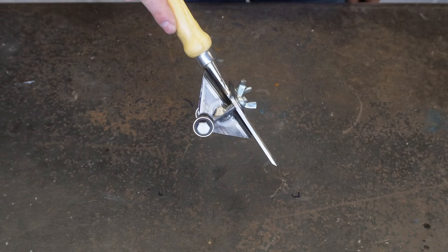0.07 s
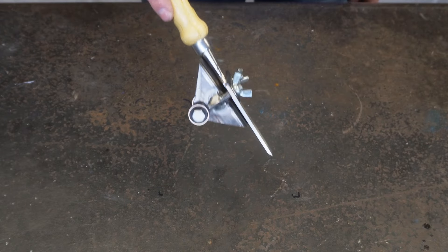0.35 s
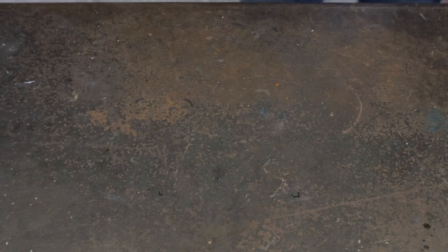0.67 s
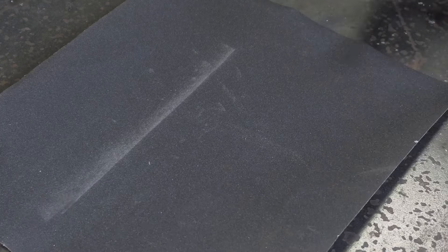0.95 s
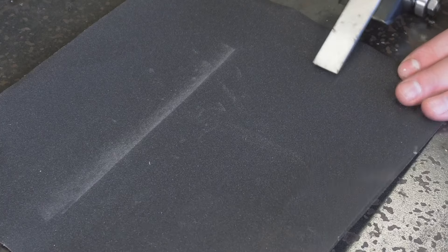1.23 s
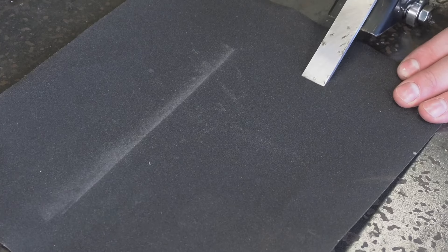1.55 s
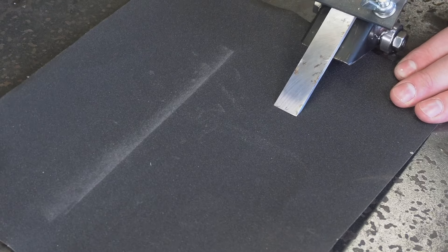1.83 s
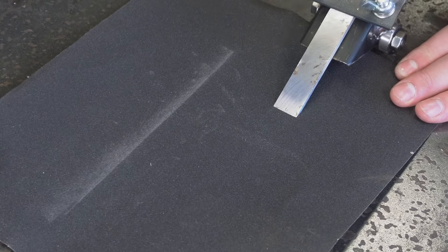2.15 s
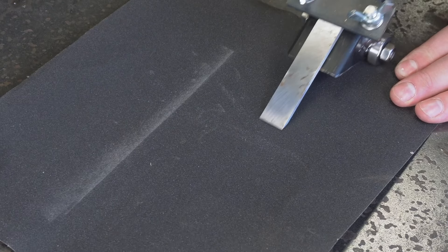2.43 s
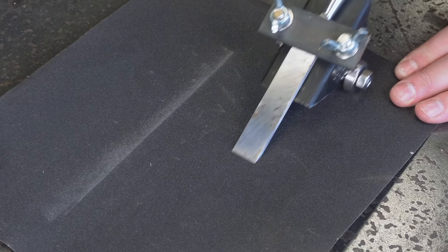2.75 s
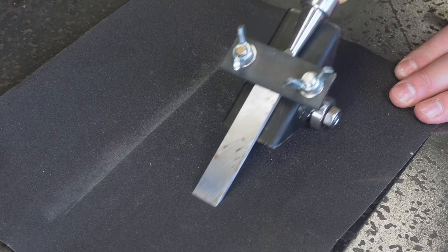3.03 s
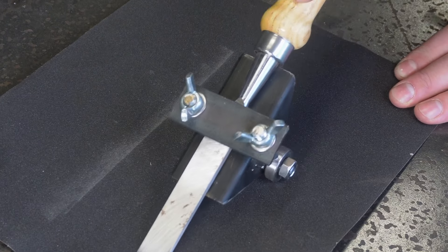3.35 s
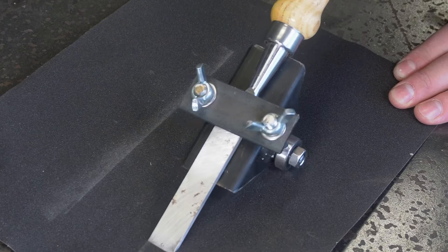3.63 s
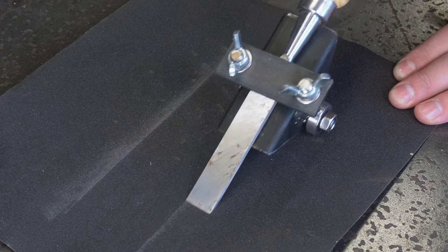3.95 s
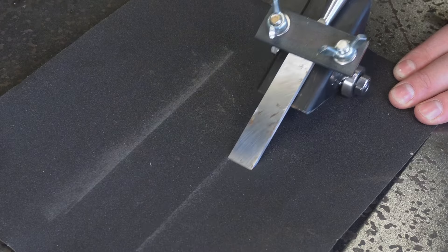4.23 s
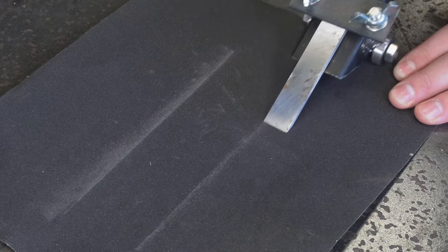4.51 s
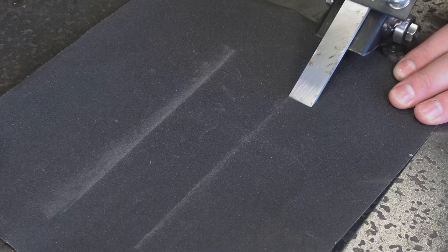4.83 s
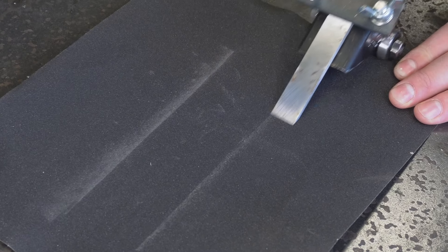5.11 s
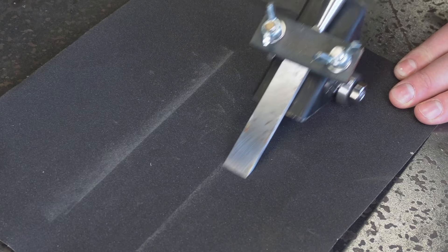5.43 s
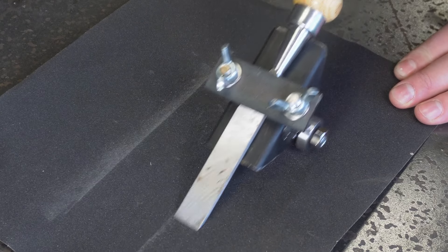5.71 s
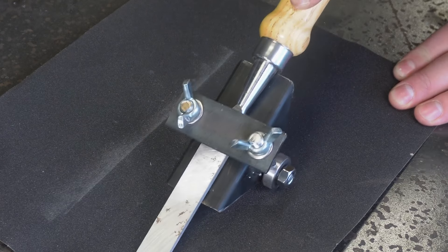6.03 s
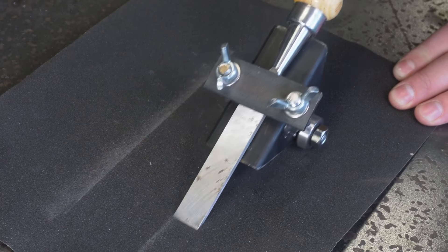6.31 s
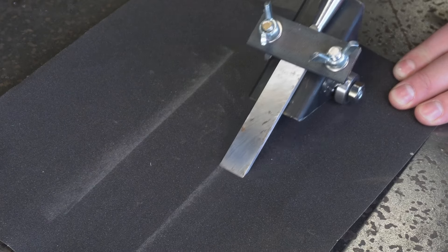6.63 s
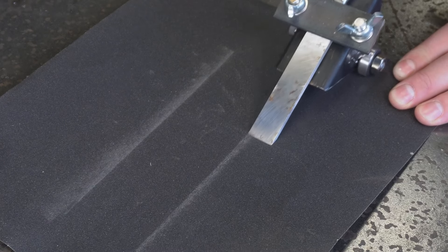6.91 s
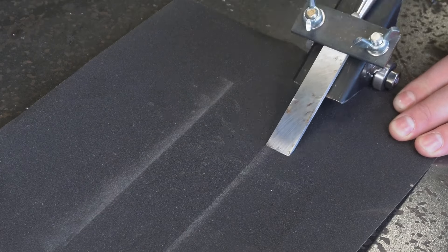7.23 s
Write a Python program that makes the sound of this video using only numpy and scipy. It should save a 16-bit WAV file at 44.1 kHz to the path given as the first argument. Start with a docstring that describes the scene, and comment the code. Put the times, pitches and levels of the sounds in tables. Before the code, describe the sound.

Sandpaper swishes onto a bench, then a chisel in a clicking steel guide scratches briefly and scrapes back and forth in long, gritty strokes.

```python
"""Air rumbles low in a small workshop, heard close and in stereo. A sheet of sandpaper swishes onto
the bench; a chisel in a steel honing guide is set down on it with a small ding. The edge makes a few
short scratches, then two long strokes forward and back: pushed, it digs in and snaps grit; pulled, it
hisses over the grains and the blade rings. Now and then the guide clicks and its roller rustles."""
import sys
import numpy as np
from scipy import signal
from scipy.fft import rfft, irfft, next_fast_len
from scipy.io import wavfile
from scipy.ndimage import map_coordinates

SR = 44100
rng = np.random.default_rng(int(sys.argv[2]) if len(sys.argv) > 2 else 0)


def to_wav(s):
    """Save 16-bit WAV."""
    ch = np.atleast_2d(s).T  # columns
    pcm = np.round(np.clip(ch, -1, 1) * 32767)  # PCM
    wavfile.write(sys.argv[1], SR, pcm.astype(np.int16))


N = 320166
TIME = np.arange(N) / SR


def amp(db):
    """Decibels to gain."""
    return 10 ** (np.asarray(db) / 20)


def unit(x):
    """Scale to rms 1."""
    return x / np.sqrt(np.mean(x ** 2) + 1e-20)


def along(points, hz):
    """Read (freq_hz, value) points on a log axis."""
    freqs, values = np.transpose(points)
    return np.interp(np.log(hz + 1), np.log(freqs + 1), values)


def curve(points):
    """Read (time_s, value) points at every sample."""
    return np.interp(TIME, *np.transpose(points))


def wobble(rate_hz):
    """Random curve, linear between knots."""
    knots = rng.standard_normal(int(N * rate_hz / SR) + 4)
    return map_coordinates(knots, [TIME * rate_hz], order=1)


def filtered(x, response):
    """Apply a complex frequency response."""
    size = next_fast_len(N + SR // 4)
    return irfft(rfft(x, size) * response(np.fft.rfftfreq(size, 1 / SR)), size)[..., :N]


def causal(db_of, size=2048):
    """Minimum-phase impulse response of a spectrum in dB."""
    cepstrum = irfft(np.log(amp(db_of(np.fft.rfftfreq(size, 1 / SR))) + 1e-6))
    cepstrum[1:size // 2] *= 2
    cepstrum[size // 2 + 1:] = 0
    return irfft(np.exp(rfft(cepstrum)))


def coloured(x, spectrum):
    """Shape x with a spectrum table, at rms 1."""
    return unit(signal.fftconvolve(x, causal(lambda hz: along(spectrum, hz)))[:N])


def resonance(hz, centre_hz, width_hz):
    """Response of one mode, 1 at its centre."""
    return 1j * hz * width_hz / (centre_hz ** 2 - hz ** 2 + 1j * hz * width_hz)


def treble_shelf(x, gain_db):
    """Raise or lower the band above 6.5 kHz."""
    treble = filtered(x, lambda hz: 1 / (1 + (6500 / (hz + 1)) ** 4))
    return x + (amp(gain_db) - 1) * treble


def add(track, start_s, sound):
    """Mix a sound into a track."""
    start = round(start_s * SR)
    track[start:start + len(sound)] += sound[:N - start]


def swell(hold_start_s, level_db, rise_s, hold_s, fall_s):
    """Gain of one movement: 20 dB per rise or fall time, flat between."""
    early_s = np.maximum(hold_start_s - TIME, 0)
    late_s = np.maximum(TIME - hold_start_s - hold_s, 0)
    return amp(np.maximum(level_db - 20 * (early_s / rise_s + late_s / fall_s), -200))


def swells(rows):
    """Gain of a series of movements; the strongest prevails."""
    return np.max([swell(*row) for row in rows], axis=0)


def grit(rate_hz, spread_db, clump_db):
    """Grain impacts of random time and size, bunched as the contact catches and frees."""
    hits = rng.random(N) < rate_hz / SR
    sizes = amp(spread_db * np.clip(rng.standard_normal(N), -2.5, 2.5))
    clumps = amp(clump_db * (wobble(700) + 0.57 * wobble(110)))
    return unit(hits * sizes * rng.choice([-1, 1], N) * clumps)


# air spectrum: freq_hz, density_db
AIR_SPECTRUM = [(12, -56), (20, -22), (32, -22), (45, -3), (60, -3.5), (138, 0.5), (163, 0), (193, 1.5),
                (446, -20.5), (1570, -25.5), (1860, -23.5), (14700, -39), (16000, -54)]
# room rumble: time_s, level_db
RUMBLE_LEVELS = [(0, -58.5), (4.8, -59), (6.2, -53.5), (7.26, -54)]
def air():
    """Workshop air: faint hiss and a low rumble that grows late on."""
    noise = coloured(rng.standard_normal(N), AIR_SPECTRUM)
    rumble = filtered(noise, lambda hz: 1 / (1 + (hz / 350) ** 4))
    return amp(curve(RUMBLE_LEVELS) - 2) * rumble + amp(-55) * (noise - rumble)


# room decay: freq_hz, t60_s
ROOM_DECAY = [(200, 0.21), (800, 0.64), (2000, 0.2), (6000, 0.1), (14000, 0.22)]
def room_echo(x, count=16):
    """Each frequency dies at its own rate; successive random tails stand for the tool moving."""
    hz, t, noise = signal.stft(rng.standard_normal((count, SR // 3)), SR, nperseg=256)
    decay = amp(-60 * t / along(ROOM_DECAY, hz)[:, None])
    tails = signal.istft(noise * decay, SR, nperseg=256)[1]
    track, predelay = np.zeros(N + SR), SR // 300
    for part, tail in zip(np.array_split(np.arange(N), count), tails):
        echo = signal.fftconvolve(x[part], tail / np.linalg.norm(tail))
        track[part[0] + predelay:][:len(echo)] += echo
    return track[:N]


# stereo width: freq_hz, side_db
STEREO_WIDTH = [(40, -32), (130, -17.5), (500, -15), (1200, -19.5), (2000, -27), (4000, -11.5), (8000, -8),
                (12000, -6)]
def stereo_spread(x, size=256):
    """Diffuse sound reaches left and right with unrelated phases, widest in the treble."""
    frames = signal.stft(np.pad(x, (size // 4, 0)), nperseg=size)[2]
    phases = np.exp(2j * np.pi * rng.random(frames.shape))
    diffuse = signal.istft(frames * phases, nperseg=size)[1][:N]
    side = filtered(diffuse, lambda hz: amp(along(STEREO_WIDTH, hz) + 3.5))
    side += filtered(x, lambda hz: 0.07 * (hz / 12000) ** 2)  # left slightly brighter
    return np.array([x + side, x - side])


# sheet shoves: hold_start_s, level_db, rise_s, hold_s, fall_s
SHEET_SHOVES = [(0.442, -51, 0.042, 0.012, .12), (0.635, -43.5, 0.024, 0.022, 0.17),
                (0.785, -38.5, 0.15, 0.015, 0.24), (0.895, -36, 0.095, 0.013, 0.071),
                (1.02, -33, 0.015, 0.018, 0.076)]
# sliding paper spectrum: freq_hz, density_db
SHEET_SPECTRUM = [(120, -43), (200, -11.5), (538, -1.5), (867, -5), (1740, -2), (1870, -1.5), (2380, -1.5),
                  (5330, -4), (8580, -13), (16000, -35)]
# hand bumps: hold_start_s, level_db, rise_s, hold_s, fall_s
HAND_BUMPS = [(0.41, -60, .1, .24, .15), (0.698, -44, 0.018, .005, .04), (0.76, -59, .05, .05, .04),
              (1.05, -51, .03, .02, 0.1)]
# hand spectrum: freq_hz, density_db
HAND_SPECTRUM = [(25, -7), (60, -5), (150, 1), (300, -9), (700, -41)]
def sheet():
    """The paper's back swishes over the bench while the hand bumps it dully."""
    friction = grit(rate_hz=20000, spread_db=2.5, clump_db=2)
    swish = swells(SHEET_SHOVES) * coloured(friction, SHEET_SPECTRUM)
    bumps = swells(HAND_BUMPS) * coloured(rng.standard_normal(N), HAND_SPECTRUM)
    return swish + amp(-1) * bumps


# roller runs: hold_start_s, level_db, rise_s, hold_s, fall_s
ROLLER_RUNS = [(1.212, -40.5, .02, .025, 0.22), (1.3, -46, .06, 0.071, .19),
               (1.87, -41.5, .12, 0.053, 0.12), (2.253, -39.5, 0.021, 0.043, 0.093),
               (5.1, -37, 0.037, 0.035, 0.18)]
# rolling spectrum: freq_hz, density_db
ROLLER_SPECTRUM = [(450, -13), (680, -5.5), (1200, -6.5), (1450, -6), (1700, 0.5), (2200, 1.5), (2700, -7),
                   (3500, -1), (4300, -4.5), (5300, -6), (7200, -17.5), (8200, -13), (10500, -25),
                   (16000, -34)]
def roller():
    """The guide's roller crosses the grit with a dull, even rustle."""
    grains = grit(rate_hz=18000, spread_db=3, clump_db=3)
    return swells(ROLLER_RUNS) * coloured(grains, ROLLER_SPECTRUM)


# guide and roller shifting: start_s, level_db, ring_hz, t60_s
GUIDE_CLICKS = [(1.2035, -35, 1980, .05), (1.219, -22.5, 2090, 0.049), (1.295, -30.5, 2170, .02),
                (1.4285, -31.5, 10100, 0.004), (1.532, -22, 4100, 0.0098), (2.0168, -27.5, 6500, 0.0032),
                (2.096, -26.5, 5500, 0.0067), (2.202, -38, 3070, .04), (2.2431, -24.5, 3170, 0.016),
                (2.2505, -15.5, 3170, 0.0075), (4.845, -9, 5030, 0.016), (4.859, -14.5, 4960, 0.029),
                (5.0402, -6.5, 9700, 0.0064), (5.052, -12.5, 3900, 0.0091)]
def guide_clicks():
    """Loose parts click; the shorter the ring, the broader the crack."""
    track, t = np.zeros(N), np.arange(SR // 3) / SR
    for start_s, level_db, ring_hz, t60_s in GUIDE_CLICKS:
        tonality = np.clip(t60_s / 0.011, 0.1, 1) ** 2
        focus_db = 2 + 12 * tonality
        colour = causal(lambda hz: along(PULL_SPECTRUM, hz) - focus_db * np.log2((hz + 1) / ring_hz) ** 2)
        crack = unit(signal.fftconvolve(rng.standard_normal(len(t)), colour)[:len(t)])
        click = (tonality * np.sin(2 * np.pi * ring_hz * t) + 0.86 * crack) * amp(-60 * t / t60_s)
        add(track, start_s, amp(level_db) * click / np.abs(click).max())
    return track


# guide set down: start_s, level_db
GUIDE_LANDING = [(1.215, -26)]
# guide's steel modes: pitch_hz, level_db, t60_s
GUIDE_MODES = [(5270, -16, 0.17), (7850, -8, 0.3), (8995, 3, 0.11), (11050, -9, 0.23), (12650, -12, .11),
               (13440, -12, .15), (14480, -11, .12)]
def guide_ding():
    """Set down, the steel rings; its parts rattle together and blur each mode."""
    track, t = np.zeros(N), np.arange(SR // 3) / SR
    for start_s, level_db in GUIDE_LANDING:
        blur = 0.052 * rng.standard_normal((len(GUIDE_MODES), len(t))).cumsum(axis=1)
        ring = sum(amp(mode_db - 60 * t / t60_s) * np.sin(2 * np.pi * pitch_hz * t + phase)
                   for (pitch_hz, mode_db, t60_s), phase in zip(GUIDE_MODES, blur))
        contact = 0.8 * rng.standard_normal(len(t)) * amp(-60 * t / 0.07)
        add(track, start_s, amp(level_db - 11) * (ring + contact))
    return track


def guide():
    """The guide's small parts click and ding but radiate no bass."""
    highpass = signal.butter(3, 1400, "highpass", fs=SR, output="sos")
    return signal.sosfilt(highpass, guide_clicks() + guide_ding())


# bench top spectrum: freq_hz, density_db
BENCH_SPECTRUM = [(60, -21), (150, -9.5), (300, 0.5), (420, 1), (560, -3.5), (680, 5), (850, 0), (1100, 5),
                  (1600, -6), (3000, -34)]
def bench_thrum(impacts):
    """Pressure drives the grain impacts into the bench top."""
    return coloured(impacts, BENCH_SPECTRUM)


# clamped blade modes: pitch_hz, width_hz, gain_db
BLADE_MODES = [(3450, 35, -2.5), (4020, 120, -2), (5500, 210, -5.5), (6120, 120, -5), (7940, 74, -5),
               (8250, 176, 4.5), (8970, 40, 7), (11280, 75, 3.5), (11900, 220, -5), (12730, 100, -5),
               (15500, 120, -4)]
def blade(x, ring_db, shimmer_db):
    """The edge excites the blade's modes; each swells and fades as the contact shifts."""
    modes = np.zeros(N)
    for pitch_hz, width_hz, gain_db in BLADE_MODES:
        gain = amp(gain_db + shimmer_db * wobble(7.9))
        modes += gain * filtered(x, lambda hz: resonance(hz, pitch_hz, width_hz))
    return unit(x + amp(ring_db) * modes)


def edge_resonance(x, centre_hz, boost_db, width_hz=250):
    """The scrape's lowest resonance, with a steep drop below it."""
    highpass = signal.butter(4, 0.74 * centre_hz, "highpass", fs=SR, output="sos")
    thinned = signal.sosfilt(highpass, x)
    return unit(filtered(thinned, lambda hz: 1 + amp(boost_db) * resonance(hz, centre_hz, width_hz)))


def gliding_resonance(x, centre_hz, count=7):
    """The lowest resonance glides, cross-faded between fixed ones."""
    steps_hz = np.linspace(centre_hz.min(), centre_hz.max(), count)
    return unit(sum(np.interp(centre_hz, steps_hz, share) * edge_resonance(x, step_hz, boost_db=4)
                    for step_hz, share in zip(steps_hz, np.eye(count))))


# short scratches: hold_start_s, level_db, rise_s, hold_s, fall_s, treble_db
EDGE_SCRATCHES = [(1.532, -39, 0.01, 0.0088, .1, -14), (1.59, -34, 0.062, 0.078, 0.11, -4),
                  (1.698, -28.5, .05, 0.041, .12, -8), (1.81, -21, 0.054, 0.025, 0.047, -1),
                  (1.908, -27.5, 0.022, 0.007, 0.028, -22), (2.097, -38.5, .005, 0.023, 0.096, 0)]
# resonances of the pecking edge: pitch_hz, width_hz, gain_db
PECK_MODES = [(1160, 240, 8.5), (1960, 90, -12), (3650, 720, 1), (4970, 410, 5.5), (7200, 580, -1),
              (11600, 2000, -6)]
def scratches():
    """The edge only pecks at the paper, each time with its own brightness."""
    grains = grit(rate_hz=10000, spread_db=2.5, clump_db=2)
    edge = blade(coloured(grains, PUSH_SPECTRUM), ring_db=-12, shimmer_db=2)
    edge = edge_resonance(edge, centre_hz=1850, boost_db=3)
    peck = filtered(edge, lambda hz: 1 + sum(amp(gain_db) * resonance(hz, pitch_hz, width_hz)
                                             for pitch_hz, width_hz, gain_db in PECK_MODES))
    gains = np.array([swell(*row[:-1]) for row in EDGE_SCRATCHES])
    treble_db = np.transpose(EDGE_SCRATCHES)[-1] @ gains / gains.sum(axis=0)
    return gains.max(axis=0) * (amp(-4) * treble_shelf(peck, treble_db) + amp(-23) * bench_thrum(grains))


def snap_spectrum_db(hz, colour_hz):
    """The smaller the grain, the more its snap tilts to the treble."""
    tilt_db = 12 * np.log2(colour_hz / 4300) * np.log2((hz + 1) / 4300).clip(-1, 1)
    bass_cut_db = 10 * np.log10(1e-6 + hz ** 6 / (hz ** 6 + 1400 ** 6))
    return along(PUSH_SPECTRUM, hz) + tilt_db + bass_cut_db


# largest grains breaking: start_s, level_db, colour_hz
GRAIN_SNAPS = [(1.6, -17.5, 3580), (1.7005, -16.5, 3980), (1.7887, -10.5, 4740), (1.9063, -21.5, 3770),
               (2.4554, -20.5, 4030), (2.5308, -11.5, 3770), (2.576, -9.5, 3720), (2.9494, -5.5, 3960),
               (2.9821, -3.5, 4050), (3.0053, -2.5, 3450), (3.0265, -4, 4400), (3.2098, -3.5, 3420),
               (3.2637, -3, 3450), (3.392, -8, 3800), (3.7594, -11.5, 3940), (3.9349, -7, 4000),
               (4.14, -7.5, 4260), (5.2071, -10, 3330), (5.383, -15, 3700), (5.436, -12, 4050),
               (5.5417, -0.5, 4000), (5.5648, -6, 6200), (5.5838, -1, 4120), (5.6145, -2.5, 3950),
               (5.6349, -0.5, 4050), (5.6536, -4.5, 3940), (5.7417, -4.5, 4200), (5.782, -7.5, 3300),
               (5.8042, -1.5, 4330), (5.8478, -2.5, 3600), (5.9697, -4.5, 3800), (6.2181, -9.5, 4030),
               (6.3969, -6, 4200), (6.6155, -7.5, 4040), (6.8868, -6, 5350)]
def snaps():
    """A large grain breaks with one sharp spike; its splinters crunch for a few milliseconds."""
    track, t = np.zeros(N), np.arange(1024) / SR
    for start_s, level_db, colour_hz in GRAIN_SNAPS:
        spike = causal(lambda hz: snap_spectrum_db(hz, colour_hz))
        splinters = 0.14 * rng.standard_normal(len(t)) * amp(-60 * t / 0.013)
        snap = signal.fftconvolve(spike, splinters - (t == 0))
        add(track, start_s, amp(level_db + 0.2) * snap / np.abs(snap).max())
    return track


def crackle(rate_hz, size_db):
    """Scattered single grains break louder than the rest."""
    return (rng.random(N) < rate_hz / SR) * -amp(size_db) * rng.uniform(0.92, 1, N)


def stroke(start_s, length_s, level_db, fastest_frac, start_sag_db, end_sag_db):
    """Gain of one stroke: it speeds up and slows down, loudest when fastest."""
    done = np.clip((TIME - start_s) / length_s, 0, 1)
    crest = np.clip(fastest_frac, 0.05, 0.95)
    speeding_db = start_sag_db * (1 - done / crest) ** 2
    slowing_db = end_sag_db * ((done - crest) / (1 - crest)) ** 2
    sag_db = np.where(done < crest, speeding_db, slowing_db)
    return swell(start_s, level_db, rise_s=0.06, hold_s=length_s, fall_s=0.057) * amp(-sag_db)


# strokes forward, back: start_s, length_s, level_db, fastest_frac, start_sag_db, end_sag_db
PUSH_STROKES = [(2.455, .05, -39, .3, 6, -1), (2.526, 0.06, -30, 0.55, 3.5, 0.5),
                (2.6, 0.069, -34, 0.8, 13, 0), (2.68, 0.72, -21.5, 0.74, 5, 4),
                (4.995, 0.23, -25.5, 0.77, 8, -0.5), (5.26, 0.74, -22.5, 0.35, 5.5, 4.5)]
PULL_STROKES = [(3.521, 0.76, -27.5, 1, 11, 1.1), (4.301, 0.65, -27.5, 0.34, 2, 10.6),
                (6.098, 0.907, -30, .28, 6, 4), (7.054, 0.18, -31.5, .6, 1.2, 2.5)]
# spectra of the edge digging, dragging: freq_hz, density_db
PUSH_SPECTRUM = [(600, -33), (1000, -18), (1400, -8.5), (1900, -4), (2700, -2.5), (3650, 1), (4030, 3),
                 (4500, -1), (6000, -3), (7300, -7), (8400, -6.5), (10500, -9), (13500, -19.5),
                 (16000, -25.5)]
PULL_SPECTRUM = [(600, -40), (1100, -13.5), (1500, -6), (1900, -3.5), (2700, -2), (4000, 2), (5000, -0.5),
                 (6200, -3), (7300, -6.5), (8500, -5.5), (10500, -10), (12000, -12.5), (13500, -19.5),
                 (16000, -24)]
# guide position: time_s, reach_frac (0 near, 1 far)
GUIDE_REACH = [(2.55, .02), (2.8, 0.24), (3.2, 0.91), (3.5, 0.85), (4.15, 0.74), (4.7, 0.25), (5.12, .05),
               (5.6, 0.67), (6.05, 1), (6.8, 0.44), (7.25, 0.45)]
def scrape():
    """Pushing is coarse and damps the blade; pulling is finer and lets it ring. Farther is brighter."""
    near_hz, reach_rise_hz, push_drop_hz = 1754, 520, 147
    push_treble_db, pull_treble_db, reach_treble_db = -6.5, -4, 8
    push = np.max([stroke(*row) for row in PUSH_STROKES], axis=0)
    pull = np.max([stroke(*row) for row in PULL_STROKES], axis=0)
    reach = curve(GUIDE_REACH)
    effort = np.hypot(push, pull)
    push_share = (push / effort) ** 2
    coarse = grit(rate_hz=10000, spread_db=4.5, clump_db=2)
    fine = grit(rate_hz=13000, spread_db=4, clump_db=2)
    dig = coloured(coarse + crackle(rate_hz=50, size_db=20.5), PUSH_SPECTRUM)
    dig = blade(dig, ring_db=-7, shimmer_db=2)
    drag = coloured(fine + crackle(rate_hz=36, size_db=14), PULL_SPECTRUM)
    drag = blade(drag, ring_db=0.5, shimmer_db=4)
    centre_hz = near_hz + reach_rise_hz * reach - push_drop_hz * push_share
    edge = gliding_resonance((push * dig + pull * drag) / effort, centre_hz)
    treble_db = push_treble_db * push_share + pull_treble_db * (1 - push_share) + reach_treble_db * reach
    thrum = (amp(-24) * push + amp(-30.5) * pull) * bench_thrum(coarse)
    hand_pressure = amp(-0.5 + 1.2 * wobble(16))
    return hand_pressure * (effort * treble_shelf(edge, treble_db) + thrum)


def scene():
    """The work on the bench, in its room, in stereo."""
    work = sheet() + roller() + scratches() + scrape() + snaps() + guide()
    return stereo_spread(work + amp(-13) * room_echo(work) + air())


def record(dry):
    """Limit to full scale and cut the top of the band."""
    top_hz = 15850
    return filtered(np.clip(dry, -1, 1), lambda hz: hz < top_hz)


dry = scene()
out = record(dry)
to_wav(out)
```